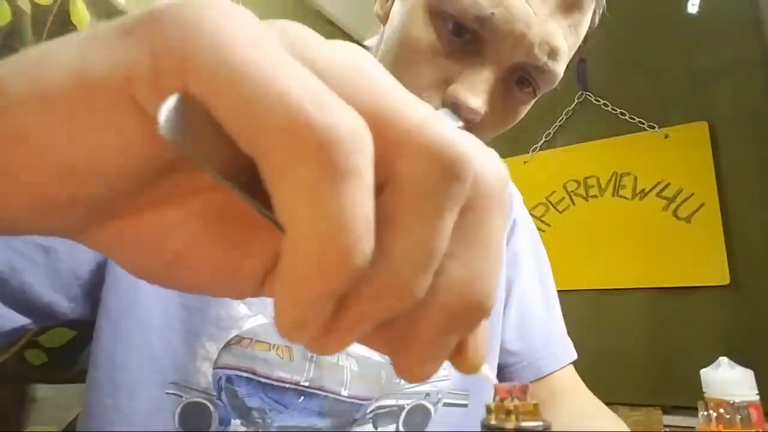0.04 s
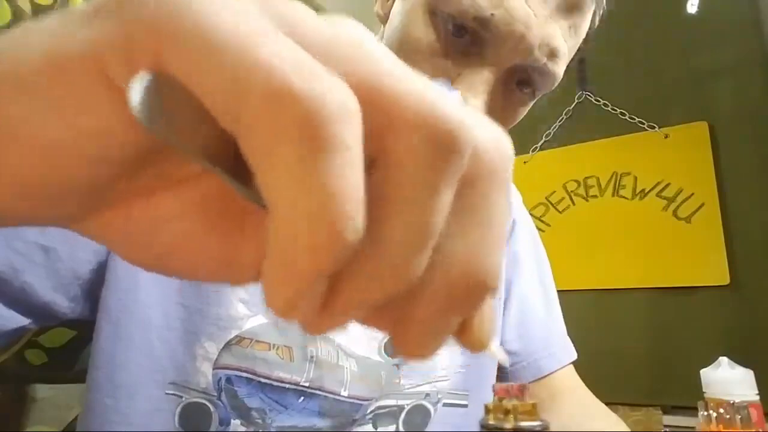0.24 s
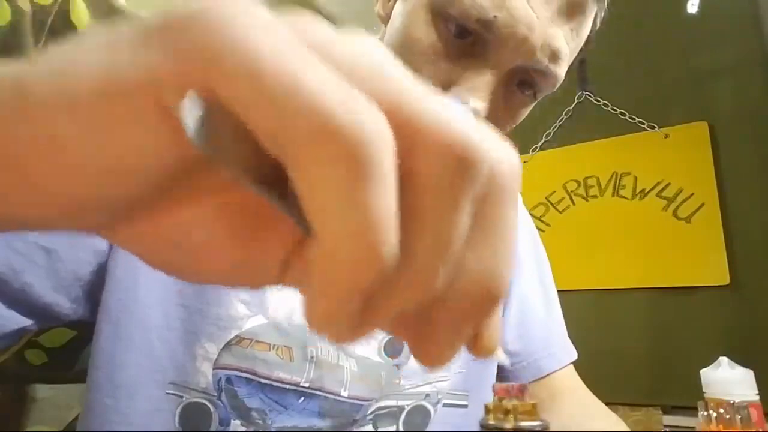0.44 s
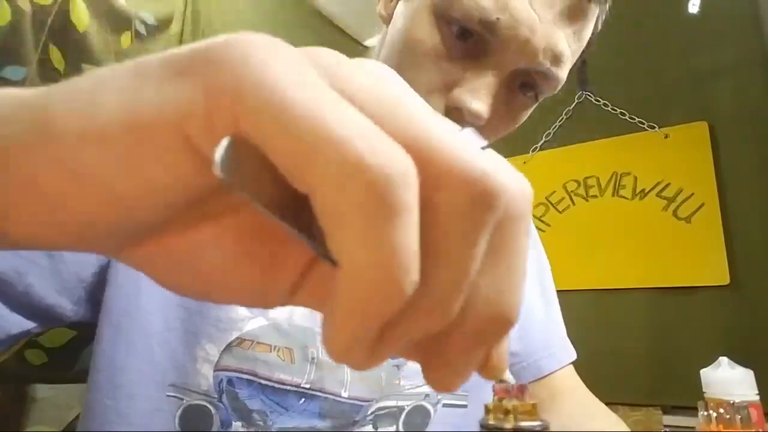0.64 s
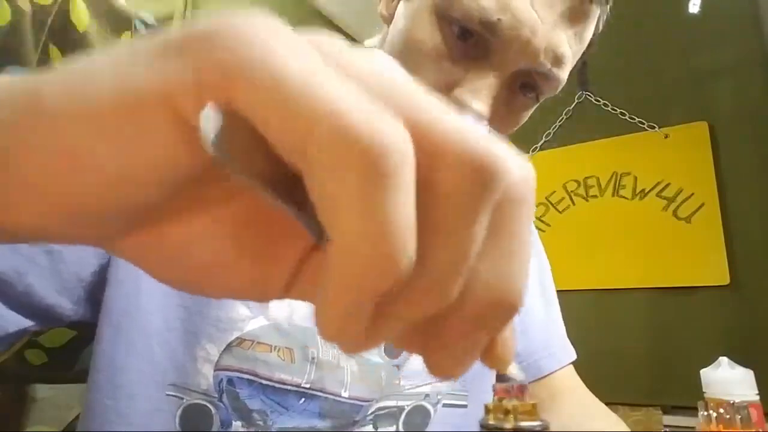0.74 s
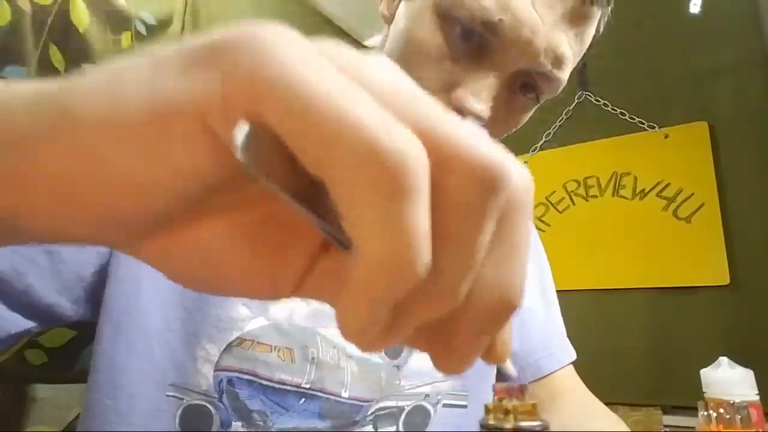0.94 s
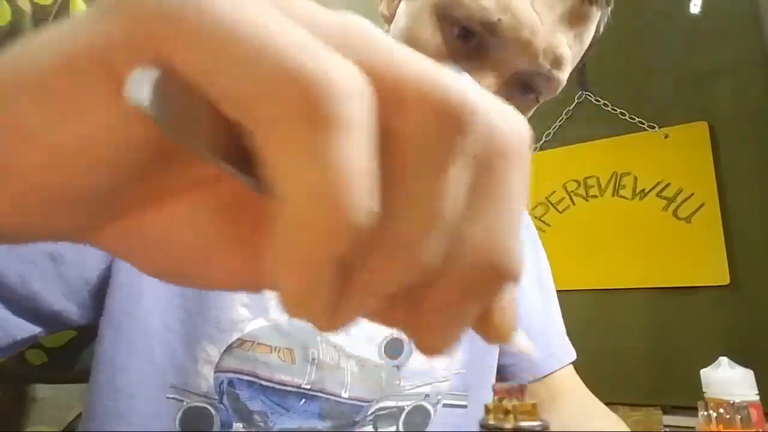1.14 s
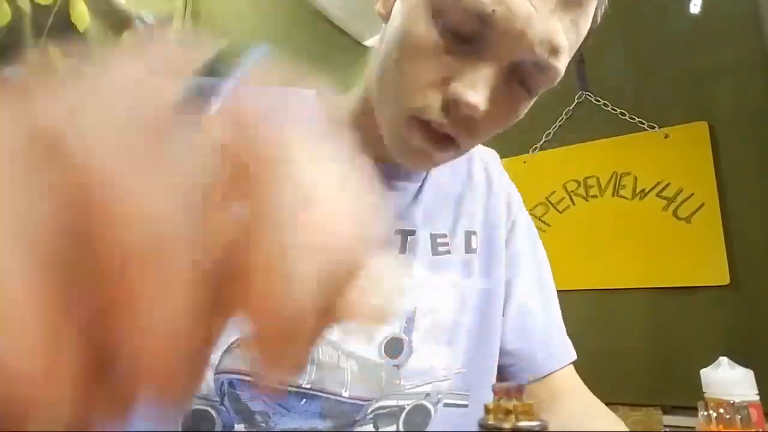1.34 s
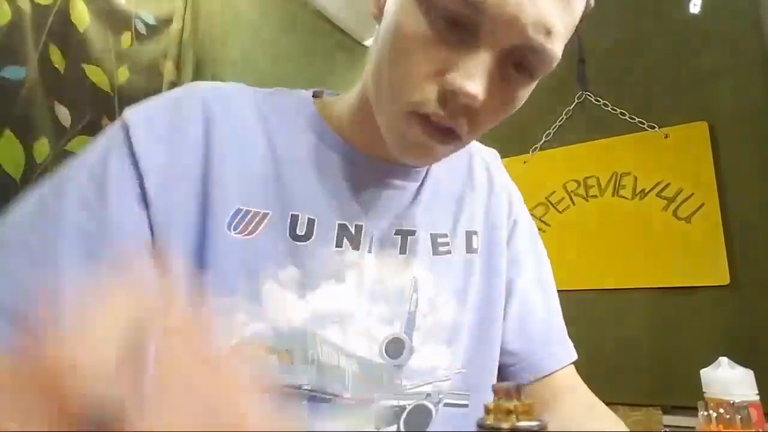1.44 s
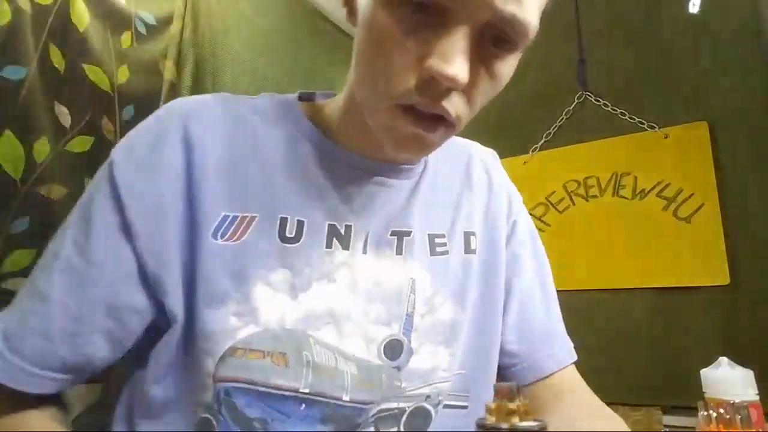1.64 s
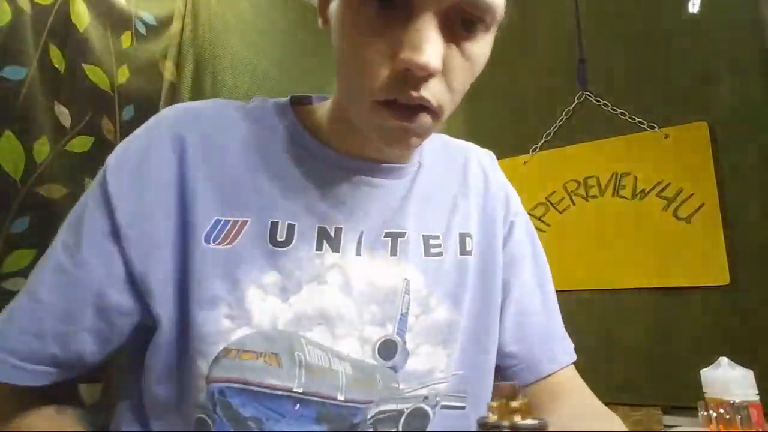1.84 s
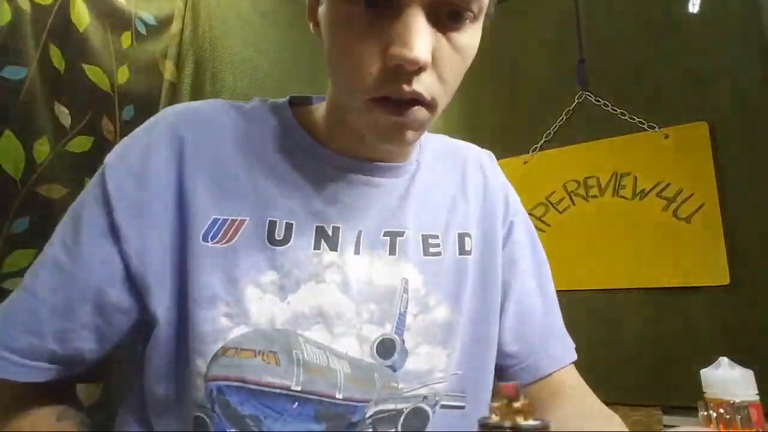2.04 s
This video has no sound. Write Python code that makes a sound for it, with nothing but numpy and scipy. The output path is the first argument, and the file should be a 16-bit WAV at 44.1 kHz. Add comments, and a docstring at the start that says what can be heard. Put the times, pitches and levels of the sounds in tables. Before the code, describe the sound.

Steel tweezers scrape on small wire coils, close up in a dry room with faint hum and hiss. At 0.2 seconds they catch, jolting the holder against a desk in quick, loud knocks. Faint scrapes and hollow taps follow around 0.7, and another scrape and knock near 1.0. A sleeve brushes softly at 1.5, a hand bumps down at 1.6, and one bright metal click sounds at 1.8.

```python
"""Over a faint hum and hiss, steel tweezers catch and scrape on small wire coils, close up in a dry room.
The tips stick and slip over the turns and jolt the holder against the desk, which rings with each knock.
The holder takes a few light, hollow taps. A sleeve brushes by, the hand comes down,
and the tweezers give one bright click as metal meets metal."""
import sys
import numpy as np
from scipy import signal
from scipy.fft import rfft, irfft
from scipy.io import wavfile

SR = 44100
rng = np.random.default_rng(int(sys.argv[2]) if len(sys.argv) > 2 else 0)


def int16_out(signal):
    """Quantize to a 16-bit WAV file."""
    q = np.round(np.clip(np.atleast_2d(signal).T, -1, 1) * 32767)
    wavfile.write(sys.argv[1], SR, q.astype(np.int16))


N = 92610


def undb(db):
    """Decibels to gain."""
    return 10 ** (np.asarray(db) / 20)


def clock():
    """Sample times in s."""
    return np.arange(N) / SR


def level(x, db):
    """Scale to an rms level."""
    return x * undb(db) / np.sqrt(np.mean(x ** 2))


def unit(response):
    """Scale to unit energy."""
    return response / np.sqrt(np.sum(response ** 2))


def through(x, response):
    """Convolve with an impulse response."""
    return signal.fftconvolve(x, response)[:N]


def butter(x, hz, kind="high", order=3):
    """Butterworth filter, high-pass by default."""
    return signal.sosfilt(signal.butter(order, hz, kind, fs=SR, output="sos"), x)


def colour(points):
    """Minimum-phase, unit-energy response from (frequency [Hz], gain [dB]) points."""
    hz, db = np.array(points).T
    bins_hz = np.maximum(np.fft.rfftfreq(N, 1 / SR), 1)
    magnitude = undb(np.interp(np.log(bins_hz), np.log(hz), db))
    cepstrum = irfft(np.log(magnitude), N)
    cepstrum[N // 2:] = 0
    return unit(irfft(np.exp(2 * rfft(cepstrum)), N))


def fade(t60_s):
    """Exponential decay."""
    return np.exp(-np.log(1000) * clock() / t60_s)


def ring(modes):
    """Decaying partials of a struck object."""
    return sum(undb(db) * fade(t60_s) * np.cos(2 * np.pi * hz * clock()) for hz, db, t60_s in modes)


def resonances(bands):
    """Unit-energy response of (frequency [Hz], width [Hz], gain [dB]) bands, alternating in sign."""
    t, response = clock(), 0
    for k, (hz, width_hz, db) in enumerate(bands):
        envelope = undb(db) * width_hz * np.exp(-np.pi * width_hz * t)
        response += (-1) ** k * envelope * np.sin(2 * np.pi * hz * t)
    return unit(response)


def burst(t60_s):
    """Decaying noise of unit energy."""
    return unit(rng.standard_normal(N) * fade(t60_s))


def impulses(rows):
    """One impulse per (time [s], level [dB]) row."""
    train = np.zeros(N)
    for time_s, db in rows:
        train[int(time_s * SR)] += undb(db)
    return train


def slips(per_s, spread_db):
    """Random stick-slip impulses, unit rms; sizes span +/- spread_db."""
    fires = rng.random(N) < per_s / SR
    signs = rng.choice([-1, 1], N)
    sizes = undb(spread_db * rng.uniform(-1, 1, N))
    return level(fires * signs * sizes, 0)


def push(time_s, db, contact_ms):
    """Half-sine contact force; a longer contact sounds duller."""
    progress = np.clip((clock() - time_s) * 1000 / contact_ms, 0, 1)
    force = np.sin(np.pi * progress)
    return undb(db) * force / force.sum()


def background():
    """Room air and hiss, a hum wavering around a steady tone, a faint whir."""
    # room air spectrum (frequency [Hz], gain [dB])
    air_spectrum = [(25, -31), (45, -12), (72, 5), (105, -6), (140, 4.5), (180, -5.5), (225, 1), (420, -5),
                    (520, -8.5), (1100, -13.5), (2100, -14), (4200, -23), (10000, -29), (11600, -24),
                    (12300, -19.5), (15800, -21)]
    hum_hz = 328.4

    def noise(response, db):
        return level(signal.fftconvolve(rng.standard_normal(2 * N - 1), response, "valid"), db)

    air = noise(colour(air_spectrum), db=-67)
    tone = level(np.sin(2 * np.pi * hum_hz * clock()), db=-72.5)
    waver = noise(resonances([(hum_hz, 21, 0)]), db=-74.5)
    whir = noise(resonances([(1536, 45, 0), (1883, 37, 0)]), db=-81)
    return air + tone + waver + whir


def scrapes():
    """Tips skip over the turns: coarse slips ring coil and holder, fine ones sizzle."""
    # drags over the wire (start [s], length [s], rasp [dB], sizzle [dB])
    drags = [(0.054, 0.0079, -64, -66), (0.191, 0.0039, -48, -49.5), (0.201, 0.013, -37, -46),
             (0.692, 0.019, -66.5, -62), (0.728, 0.017, -53.5, -61), (0.749, 0.033, -54, -52.5),
             (1.034, 0.027, -43, -47), (1.06, 0.0073, -47, -46)]
    # coil and holder resonances (frequency [Hz], width [Hz], gain [dB])
    rasp_bands = [(459, 210, -1.5), (552, 67, 2.5), (775, 173, 1), (1017, 58, -2), (1214, 89, 2.5),
                  (1670, 130, -9), (2230, 200, -10.5), (3900, 520, -24.5)]
    # fine slip spectrum (frequency [Hz], gain [dB])
    sizzle_spectrum = [(900, -30), (2600, -7), (4500, -11), (6300, -12), (7900, -4.5), (9100, -15.5),
                       (11400, -6.5), (12700, 0), (15800, 0)]
    attack_s, release_s = 0.0036, 0.0028
    coarse, fine = slips(per_s=1200, spread_db=5), slips(per_s=2200, spread_db=6)
    t, rasp, sizzle = clock(), 0, 0
    for start_s, length_s, rasp_db, sizzle_db in drags:
        attack = np.clip((t - start_s) / attack_s, 0, 1)
        release = np.exp(-np.maximum(t - start_s - length_s, 0) / release_s)
        pressure = attack * release
        length_gain = np.sqrt(length_s * SR)  # energy grows with length
        rasp += undb(rasp_db) * length_gain * unit(pressure * coarse)
        sizzle += undb(sizzle_db) * length_gain * unit(pressure * fine)
    return through(rasp, resonances(rasp_bands)) + through(sizzle, colour(sizzle_spectrum))


def knocks():
    """Short pushes ring the desk; the resting hand damps it."""
    # jolts (time [s], level [dB], contact [ms], hand damping t60 [s])
    jolts = [(0.054, -34, 1.4, 0.15), (.078, -26, 2.3, 0.23), (.193, -25, 0.51, 0.1),
             (0.2053, -4, 2.4, 2.3), (0.2124, -2.5, 1.71, 1.1), (0.2259, 0.5, 3.37, 3.4),
             (0.2547, -10, 3.24, 4.3), (0.6975, -24, 2.26, 0.11), (0.72, -30.5, 1.3, 0.24),
             (1.039, -19.5, 0.58, 0.059), (1.059, -17, 2.4, 0.28), (1.632, -11.5, 0.97, 0.28),
             (1.643, -21.5, 1.16, 0.24)]
    # desk modes before hand damping (frequency [Hz], gain [dB], t60 [s])
    desk_modes = [(139, -32, .31), (163, -40, .13), (217, -39, .17), (250, -41, .11), (319, -32, .12),
                  (345, -37, .12), (419, -33, .14), (470, -42, .08), (800, -43, .09), (956, -47, .14)]
    # desk thud spectrum (frequency [Hz], gain [dB])
    thud_spectrum = [(50, -29.5), (110, -8.5), (200, 2.5), (350, -1.5), (600, -7.5), (1200, -23.5),
                     (2000, -8), (4000, -23), (12000, -52)]
    thud = undb(3) * through(burst(t60_s=0.11), colour(thud_spectrum))
    desk = butter(ring(desk_modes) + thud, hz=92.6)
    return sum(through(push(time_s, db, contact_ms), desk * fade(hand_t60_s))
               for time_s, db, contact_ms, hand_t60_s in jolts)


def clicks():
    """Metal meets metal: a crack, a short rattle, ringing blades and their high shimmer."""
    # tweezer contacts (time [s], level [dB])
    contacts = [(0.2037, -24.5), (0.699, -63.5), (1.8016, -15), (1.8025, -14.5), (1.8073, -25)]
    # crack and rattle spectrum (frequency [Hz], gain [dB])
    crack_spectrum = [(300, -1.5), (750, -14.5), (1100, -5), (1750, 7.5), (3100, -11.5), (5700, -5),
                      (6900, -6), (8000, -1), (9300, -18.5), (12000, -3), (16000, -18.5)]
    # blade modes (frequency [Hz], gain [dB], t60 [s])
    blade_modes = [(1250, -29, .01), (1717, -24, .017), (1930, -29, .013), (2250, -28, .016),
                   (2510, -33, .02), (4030, -39, .035), (5535, -32, .03), (5760, -34, .02),
                   (7850, -29, .035), (12030, -40, .04), (15630, -36, .03)]
    contact_noise = 0
    for contact in contacts:
        crack = undb(-0.5) * burst(t60_s=0.0062)
        rattle = undb(-11) * burst(t60_s=0.033)
        contact_noise += through(impulses([contact]), crack + rattle)
    shimmer = undb(-8.5) * through(burst(t60_s=0.058), resonances([(8140, 200, 0)]))
    blades = through(impulses(contacts), ring(blade_modes) + shimmer)
    return butter(through(contact_noise, colour(crack_spectrum)) + blades, hz=452)


def ping():
    """The hardest jolt leaves a small metal part ringing."""
    ring_hz, t60_s = 1212, 0.35
    return through(push(time_s=0.232, db=-57, contact_ms=0.3), ring([(ring_hz, 0, t60_s)]))


def taps():
    """Light taps ring the holder's hollow modes."""
    # taps on the holder (time [s], level [dB], contact [ms])
    touches = [(.7678, -38.5, 0.27), (.774, -45, 0.1), (1.894, -49, 0.72)]
    # holder modes (frequency [Hz], gain [dB], t60 [s])
    holder_modes = [(328, -15, .1), (576, 0, .13), (660, -11, .06), (795, -10, .05), (1275, -11, .07),
                    (1560, -20, .1)]
    return through(sum(push(*touch) for touch in touches), ring(holder_modes))


def sleeve():
    """Cloth brushes past as the arm drops; a soft rumble follows."""
    # sleeve passes (centre [s], Gaussian sigma [s], level [dB])
    brushes = [(1.441, 0.015, -65.5), (1.528, 0.016, -61.5), (1.554, 0.028, -54.5)]
    # cloth friction spectrum (frequency [Hz], gain [dB])
    cloth_spectrum = [(50, -4), (70, 6), (120, -9), (300, 10.5), (520, -1), (850, 4.5), (1300, -8.5),
                      (2200, -10), (4000, -27.5), (8000, -29.5), (16000, -40)]

    def swell(centre_s, sigma_s):
        return np.exp(-0.5 * ((clock() - centre_s) / sigma_s) ** 2)

    pressure = sum(undb(db) * swell(centre_s, sigma_s) for centre_s, sigma_s, db in brushes)
    rumble = level(through(rng.standard_normal(N), resonances([(71, 8.3, 0)])), db=-60.5)
    cloth = through(slips(per_s=4000, spread_db=11), colour(cloth_spectrum))
    return pressure * cloth + swell(centre_s=1.62, sigma_s=0.025) * rumble


def room(x):
    """Direct sound plus a small room's diffuse tail, shorter in the treble."""
    delay_s = 0.007
    mids = butter(burst(t60_s=0.22), hz=[250, 3000], kind="band", order=2)
    treble = butter(burst(t60_s=0.11), hz=3000, order=2)
    tail = undb(-11.5) * mids + undb(-10) * treble
    return x + through(x, np.pad(tail, (int(delay_s * SR), 0)))


def scene():
    """Handling sounds in the room over the background, mono."""
    handling = scrapes() + knocks() + clicks() + ping() + taps() + sleeve()
    return (room(handling) + background())[None]


def record(dry):
    """Cut the deepest bass and the top treble."""
    low_hz, top_hz = 50, 16000
    top_cut = signal.ellip(10, 0.2, 70, top_hz, fs=SR, output="sos")
    return signal.sosfilt(top_cut, butter(dry, low_hz))


dry = scene()
out = record(dry)
int16_out(out)
```